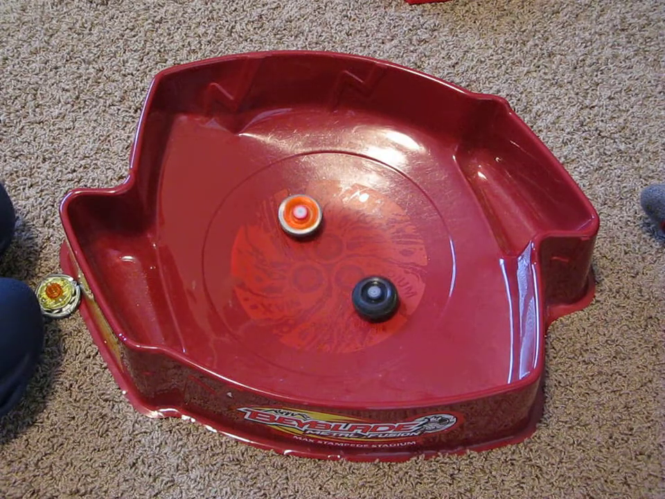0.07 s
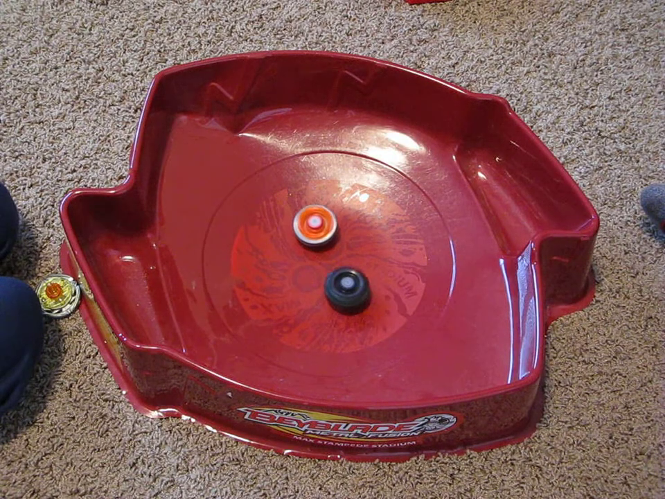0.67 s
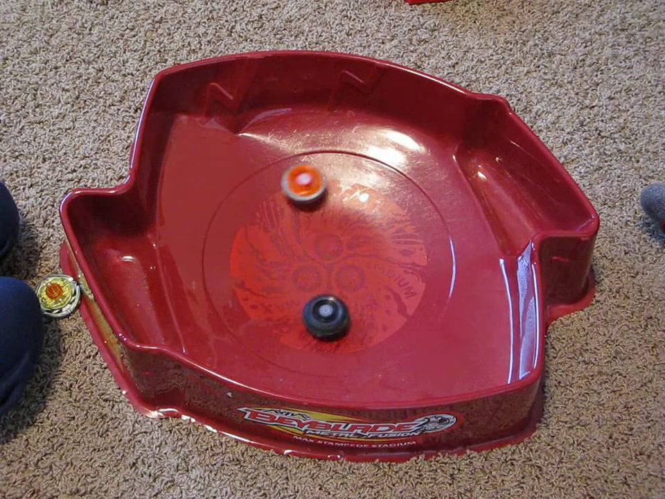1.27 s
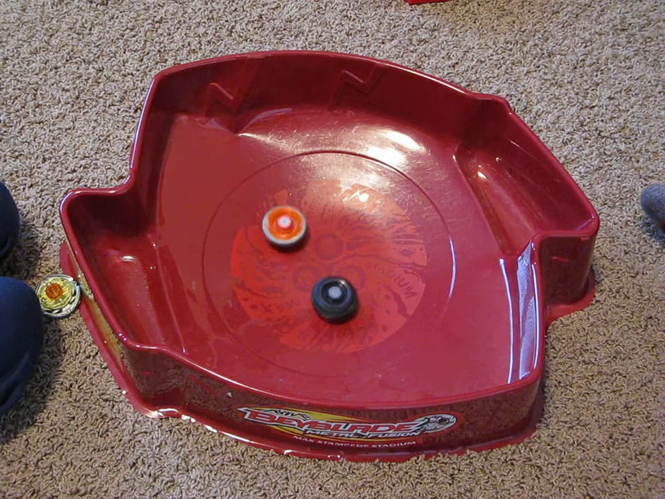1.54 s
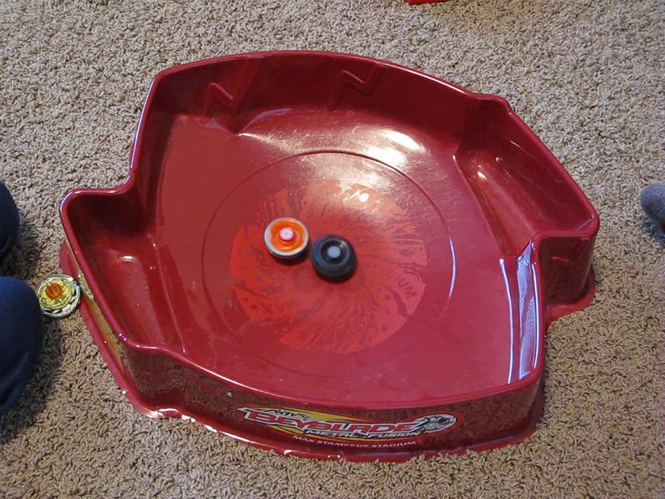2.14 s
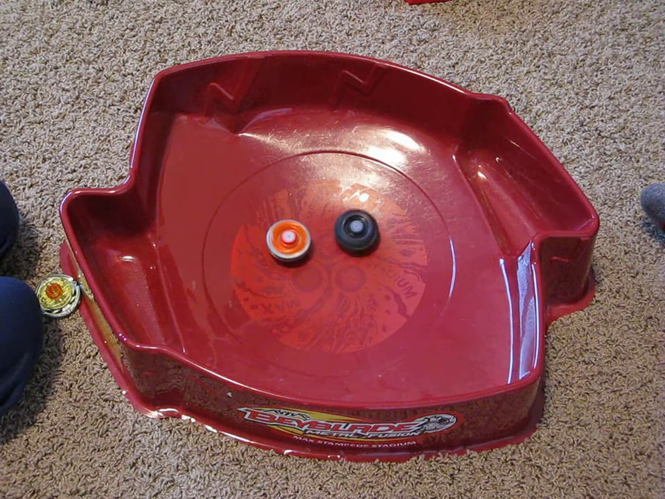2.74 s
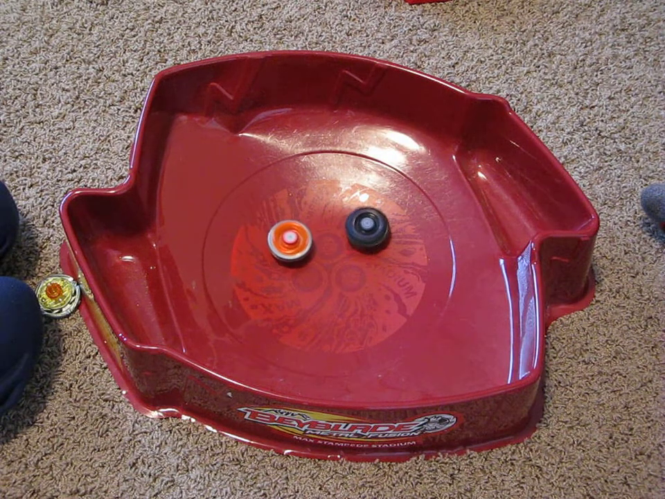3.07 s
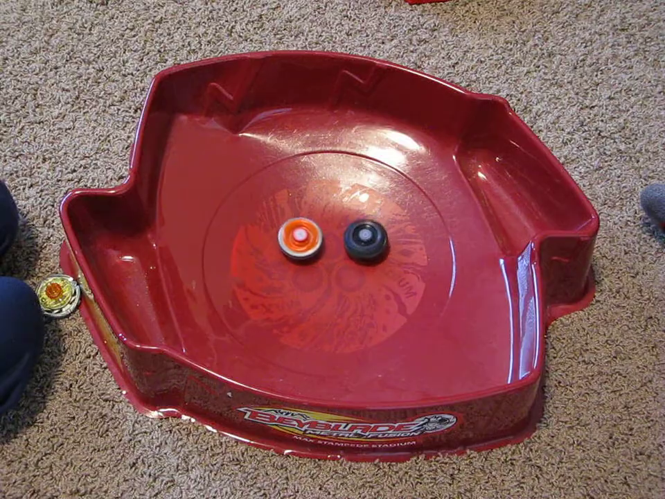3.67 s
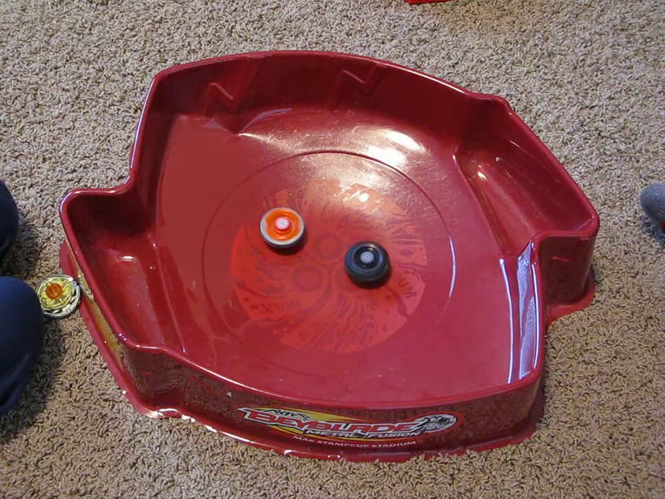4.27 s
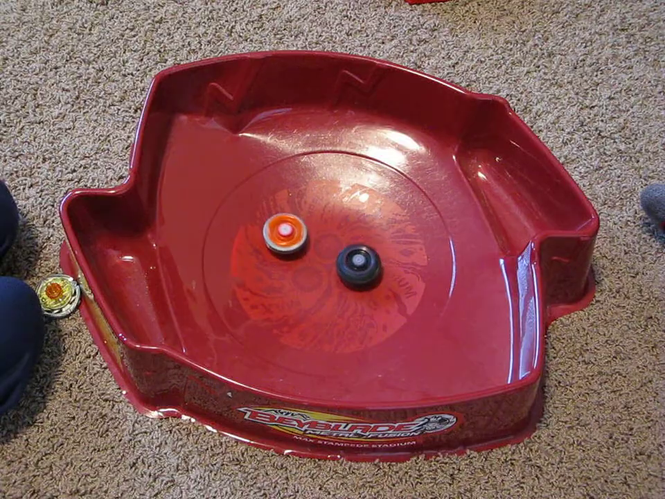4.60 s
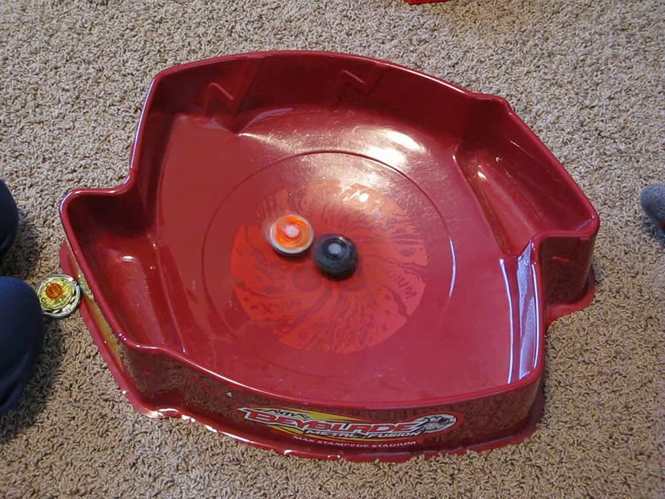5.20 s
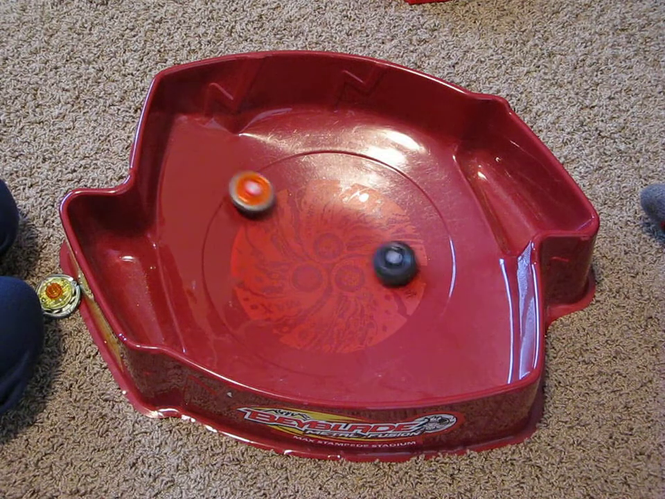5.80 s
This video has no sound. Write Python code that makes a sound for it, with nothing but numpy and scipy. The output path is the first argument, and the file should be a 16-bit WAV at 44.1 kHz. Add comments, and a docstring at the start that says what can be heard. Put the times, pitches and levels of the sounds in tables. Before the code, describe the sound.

Two metal spinning tops whirr in a plastic bowl and clash four times with sharp clinks and brief high, shimmering rings.

```python
"""In a plastic bowl on a carpet, two metal spinning tops circle and clash four times.
Each impact cracks and excites the modes of their metal wheels; rotation splits every mode into a
shimmering cluster. Friction at the tips makes the shell whirr and chatter, and the tops rattle, knock
and bump against it. Cloth rustles nearby over the hiss of the room, and the camera's gain ducks
after each clash."""
import sys
import numpy as np
from scipy import signal
from scipy.fft import rfft, irfft, next_fast_len
from scipy.io import wavfile
from scipy.ndimage import uniform_filter1d, minimum_filter1d, map_coordinates

SR = 44100
rng = np.random.default_rng(int(sys.argv[2]) if len(sys.argv) > 2 else 0)


def bounce(signal):
    """Save signal as a 16-bit WAV file at the path given by the first command-line argument."""
    frames = np.transpose(np.atleast_2d(signal))
    limited = np.clip(frames, -1, 1)
    pcm = np.round(limited * 32767).astype(np.int16)
    wavfile.write(sys.argv[1], SR, pcm)


N = 261639
TIME = np.arange(N) / SR

# Rotation of the tops. Each row: time in seconds, turns per second.
SPIN_RATE = [(0, 42.7), (1.3, 41), (2.3, 39.5), (4.4, 38), (5.18, 37.4), (5.21, 35), (5.93, 34.4)]
# Collisions. Each row: start in seconds, crack in dB, contact in seconds, clack in Hz, sizzle in dB,
# tilt in dB per octave, bowl thud in dB, first wheel in dB, second wheel in dB, ring length factor.
COLLISIONS = [(-.3, -12, .002, 5000, 0, 0, -20, -27, -60, 0.8),
              (0.9894, -12.5, 0.0022, 5100, -3, 1, -56, -31.5, -38, 0.46),
              (1.0045, 0.5, 0.0043, 5200, 10, 0, -15, -38, -13, 0.75),
              (2.063, -2.5, 0.003, 4370, 11.5, 1, -23.5, -21, -36, 0.89),
              (4.0857, 0.5, 0.0032, 10250, -15, 1.2, -11, -20, -29.5, 1.054),
              (5.197, 3, 0.0043, 6900, 6, 0.35, -9, -19, -18.5, 0.86)]


def clashes():
    """Impact: brief metal contact radiates a broadband crack, and the tips pass the kick to the bowl."""
    # Spectra. Each row: frequency in Hz, relative level in dB.
    crack_spectrum = [(40, -54), (300, -18.5), (1000, -4.5), (2200, -8), (3000, -11), (4300, 0),
                      (6000, -1.5), (8500, -1.5), (11000, 0.5), (14000, -1), (16000, -8.5)]
    thud_spectrum = [(20, -42), (45, -20), (70, -10), (130, -6.5), (280, 15), (600, -11.5), (1300, 1),
                     (2500, -5), (6000, -17)]
    out = np.zeros(N)
    for s, db, contact, clack_hz, sizzle_db, tilt_db, thud_db, *_ in COLLISIONS:
        def colour(hz):
            # sharper edges give more top treble
            sizzle = sizzle_db * hump(hz, 18400, octaves=0.52)
            return along(crack_spectrum, hz) + sizzle + tilt_db * np.log2(hz + 1)

        crack = burst(lambda hz: colour(hz) + 7 * hump(hz, clack_hz, octaves=0.19), contact, squareness=2)
        # the walls gather the crack from all directions, so its tail has a smoother colour
        spread = burst(colour, life=0.0046)
        spread *= np.linalg.norm(crack) / np.linalg.norm(spread)
        thud = burst(lambda hz: along(thud_spectrum, hz), life=0.0021, squareness=1.7)
        thud = high_pass(thud, edge_hz=63, order=3)
        add(out, s, amp(db) * crack)
        add(out, s, amp(db - 8) * reverberation(spread))
        add(out, s, amp(thud_db) * in_room(thud, wet_db=-33))
    return out


def rings():
    """Free vibration: after each clash both wheels ring in their modes, each as hard as it was struck."""
    # Wheel modes. Each row: frequency in Hz, lobes round the rim.
    first_modes = [(5428, 2), (9502, 2), (11710, 1), (13350, 3), (14485, 3), (15365, 1), (15685, 1)]
    second_modes = [(5663, 2), (8600, 3), (9500, 2), (11660, 1)]
    # Their decay. Each row: relative level in dB, t60 in seconds at length factor 1, unbalance in dB.
    first_decay = [(-2.5, 1.353, -1), (-2.5, 0.4, -1.5), (-30, 0.17, -6), (-7, 0.18, 3), (2, 0.25, -10),
                   (-3, 0.19, -15), (-28, 0.29, -14)]
    second_decay = [(-14.5, 1, 9), (-17, 0.57, -1), (-9.5, 0.56, -8), (-7, 0.32, -10)]
    angle = spin_angle()
    out = np.zeros(N)
    for s, *_, first_db, second_db, length in COLLISIONS:
        out += amp(first_db) * wheel(first_modes, first_decay, s, length, angle)
        out += amp(second_db) * wheel(second_modes, second_decay, s, length, angle)
    return in_room(out, wet_db=-6.5)[:N]


def wheel(modes, decay, s, length, angle):
    """Modulation: lobes sweep past the listener, splitting each mode by multiples of the spin rate."""
    # Relative levels in dB, one for each of the five orders below.
    sideband_db = [-6.5, -2, -18, -9.5, 1]
    inner = np.array([0, 1, 1, 1, 0])
    out = np.zeros(N)
    for (hz, lobes), (db, t60, unbalance_db) in zip(modes, decay):
        span = (TIME >= s) & (TIME < s + t60 * length)
        t = TIME[span] - s
        fade = amp(db - 60 * t / (t60 * length))
        orders = [-lobes, -1, 0, 1, lobes]
        for order, line_db in zip(orders, sideband_db + inner * unbalance_db):
            phase = 2 * np.pi * (hz * t + rng.random()) + order * angle[span]
            # the flung top moves through the bowl's echoes, so each line's level drifts until it slows
            drift = sway(len(t), rate=18.3, depth_db=3, settle=0.58)
            out[span] += amp(line_db) * fade * drift * np.sin(phase)
    return out


def spin_angle():
    """Rotation angle in radians, the integral of the spin rate."""
    return 2 * np.pi * np.cumsum(np.interp(TIME, *np.transpose(SPIN_RATE))) / SR


def tips():
    """Friction noise: the tips rub the shell, harder once a turn and louder the faster a top runs."""
    # Runs across the bowl. Each row: time of top speed in seconds, whirr in dB, scratch in dB,
    # run-up in seconds, coasting in seconds.
    runs = [(0.02, -47.5, -50.5, 0.05, 0.15), (1.16, -40, -33.5, 0.037, 0.14),
            (3.45, -53, -57, 0.081, 0.17), (4.2, -52, -47, 0.05, 0.35), (5.362, -39, -30.5, 0.016, 0.17),
            (5.75, -47, -49.5, 0.088, 0.34), (5.915, -41.5, -44.5, 0.067, 0.2)]
    # Spectra. Each row: frequency in Hz, relative level in dB.
    drum_spectrum = [(30, -28), (70, -12.5), (125, -12), (200, 0), (290, 6), (400, 2.5), (600, -1),
                     (1200, -20), (4000, -61)]
    whirr_spectrum = [(50, -36), (200, -39), (500, -6.5), (780, 0), (1000, -1), (1280, -2), (1650, -2.5),
                      (2000, -4.5), (2600, -8.5), (5000, -44)]
    scratch_spectrum = [(100, -58), (1200, -22), (2600, -8), (4200, -0.5), (6200, -7), (9000, -6.5),
                        (12000, -8), (16000, -12)]
    drum_db, whirr_db, scratch_db = -59.5, -57, -60.5  # spinning on the spot
    regrip = 2.36  # slipping dies this many times faster than rolling
    rolling = sum((amp(db) * run_speed(s, rise, coast)) ** 2 for s, db, _, rise, coast in runs) ** .5
    slipping = sum((amp(db) * run_speed(s, rise, coast / regrip)) ** 2
                   for s, _, db, rise, coast in runs) ** .5
    grip = unit(amp(1.1 * np.cos(spin_angle()) + 0.79 * wobble(120)))
    wander = amp(1.5 * wobble(9))
    drum = np.hypot(amp(drum_db), amp(-6.5) * rolling)
    drum *= noise(lambda hz: along(drum_spectrum, hz) + bowl(hz))
    whirr = np.hypot(amp(whirr_db) * wander, rolling)
    whirr *= noise(lambda hz: along(whirr_spectrum, hz) + bowl(hz))
    scratch = np.hypot(amp(scratch_db), slipping) * noise(lambda hz: along(scratch_spectrum, hz))
    return grip * (drum + whirr + scratch)


def run_speed(s, rise, coast):
    """Frictional decay: a top's speed rises smoothly to 1 at time s, then drains exponentially."""
    t = TIME - s
    return np.exp(-(np.minimum(t, 0) / rise) ** 2 / 2 - np.maximum(t, 0) / coast)


def bowl(hz):
    """Resonance: the lift in dB that the modes of the plastic shell give each frequency."""
    # Each row: centre in Hz, width in Hz, lift in dB.
    resonances = [(288.3, 5.9, 7.5), (474, 17, 9.5), (791, 13, 2.5), (1148, 120, 5.5), (1329, 18, 7.5),
                  (2046, 11, 8)]
    return sum(db / (1 + (2 * (hz - centre) / width) ** 2) for centre, width, db in resonances)


def chatter(size=16384):
    """Frictional excitation: a slipping tip drives one shell resonance and a weaker one above it."""
    # Each row: midpoint in seconds, level in dB, half length in seconds, resonance in Hz.
    slips = [(0.151, -51, 0.051, 1350), (1.21, -44.5, 0.057, 495), (1.249, -44, 0.1, 770),
             (1.797, -49.5, 0.022, 1276), (2.134, -48.5, .035, 1273), (4.191, -45, 0.039, 1325),
             (4.803, -51.5, 0.066, 1303), (5.389, -48, 0.1, 757), (5.605, -45.5, 0.032, 1237),
             (5.81, -48.5, 0.035, 1310), (5.902, -35, .005, 4530)]
    out = np.zeros(N)
    t = (np.arange(size) - size / 2) / SR
    for s, db, half, centre_hz in slips:
        lower = noise(lambda hz: 45 * hump(hz, centre_hz, octaves=0.2) - 45, size)
        upper = noise(lambda hz: 45 * hump(hz, 1.594 * centre_hz, octaves=0.063) - 45, size)
        swell = np.exp(-(t / half) ** 2 / 2)
        add(out, s + t[0], amp(db) * swell * (lower + amp(-9) * upper))
    return out


def rattles():
    """Periodic impact: a leaning top strikes the bowl once a turn, with uneven force."""
    # Each row: start in seconds, relative level in dB, number of turns.
    leans = [(1.302, -32.5, 1), (1.38, -34.5, 4), (1.8846, -46, 4), (5.4451, -33, 2), (5.5924, -30, 1),
             (5.842, -30.5, 3)]
    # Each row: frequency in Hz, relative level in dB.
    spectrum = [(700, -25), (2500, -4), (4300, 9), (5800, -7), (6800, 0.5), (7800, -18), (9200, 1),
                (11500, -7), (16000, -12)]
    scatter_db = 2.5
    out = np.zeros(N)
    for s, db, turns in leans:
        period = 1 / np.interp(s, *np.transpose(SPIN_RATE))
        for turn in range(turns):
            tick = amp(rng.normal(0, scatter_db)) * burst(lambda hz: along(spectrum, hz), life=0.0034)
            add(out, s + turn * period, amp(db - 4) * in_room(tick, wet_db=1.5))
    return out


def knocks():
    """Impulse response: a light blow on the plastic excites a band coloured by the shell's modes."""
    # Each row: start in seconds, relative level in dB, centre in Hz, width in octaves,
    # contact in seconds.
    blows = [(.518, -43, 4270, 2.2, 0.012), (0.6676, -34.5, 1820, 1.1, 0.00093),
             (1.874, -37.5, 1240, 1.1, 0.0042), (1.923, -33, 1060, 1.1, 0.0043),
             (3.06, -41, 2080, 1.2, 0.0093), (3.142, -40.5, 1390, 2.3, 0.011),
             (3.2898, -25, 1390, 3.1, 0.0037), (3.401, -35.5, 1100, 2.6, 0.0084),
             (3.77, -39, 1190, 1.7, 0.013)]
    out = np.zeros(N)
    for s, db, centre_hz, octaves, contact in blows:
        knock = burst(lambda hz: 32 * hump(hz, centre_hz, octaves) + bowl(hz), contact)
        add(out, s, amp(db - 4) * in_room(knock, wet_db=1.5))
    return out


def bumps():
    """Damped resonance: flung tops bump over the bowl's slope and excite mainly its low modes."""
    # Each row: start in seconds, relative level in dB.
    jolts = [(1.12, -36), (1.297, -35.5), (5.31, -23.5), (5.344, -23.5), (5.369, -22), (5.717, -22)]
    # Each row: frequency in Hz, relative level in dB.
    spectrum = [(25, -55), (70, -49), (170, -5.5), (290, 8.5), (420, -3.5), (750, -1.5), (1300, -5),
                (2500, -12), (5000, -15), (12000, -50)]
    out = np.zeros(N)
    for s, db in jolts:
        bump = burst(lambda hz: along(spectrum, hz) + bowl(hz), life=0.017)
        add(out, s, amp(db - 9) * in_room(high_pass(bump, edge_hz=190), wet_db=0))
    return out


def cloth():
    """Friction of fibres: fabric beside the bowl gives soft swishes of grainy noise."""
    # Each row: midpoint in seconds, relative level in dB, half length in seconds.
    swishes = [(0.107, -48, 0.032), (0.437, -56.5, 0.061), (2.588, -50.5, 0.031), (3.117, -53.5, 0.054),
               (3.265, -50, 0.078), (3.532, -30.5, 0.025), (4.463, -47, 0.026), (4.564, -48.5, 0.027),
               (4.68, -49.5, 0.044), (4.794, -50, 0.031)]
    # Each row: frequency in Hz, relative level in dB.
    spectrum = [(290, -55), (500, -17), (1210, -15), (1420, -9.5), (2330, -10), (2770, -5), (3110, -5.5),
                (8580, -10.5), (13600, -14.5), (16000, -19)]
    stroke = sum(amp(db) * np.exp(-((TIME - s) / half) ** 2 / 2) for s, db, half in swishes)
    fibres = noise(lambda hz: along(spectrum, hz)) * amp(1.7 * wobble(300))
    return in_room(amp(-2.5) * stroke * fibres, wet_db=-2.5)[:N]


def room_hiss():
    """Ambient noise: a quiet, steady broadband floor."""
    # Each row: frequency in Hz, relative level in dB.
    spectrum = [(15, -62), (25, -39), (117, -2.5), (229, -7.5), (463, -4), (775, -4), (988, -8.5),
                (1440, -10.5), (1940, -11), (5140, -13.5), (5570, -18), (6210, -15.5), (16000, -26)]
    return amp(-54.5) * noise(lambda hz: along(spectrum, hz))


def reverberation(x):
    """Diffuse field: wall reflections build into a tail in which each band decays at its own rate."""
    # Each row: frequency in Hz, t60 in seconds.
    decay_times = [(150, 0.19), (1200, 0.37), (4500, 0.47), (9000, 0.34), (15000, 0.27)]
    hz, t, bands = signal.stft(rng.standard_normal(SR * 2 // 3), SR, nperseg=256)
    build = 1 - np.exp(-(t / 0.001) ** 2)
    fade = amp(-60 * t / along(decay_times, hz)[:, None])
    tail = signal.istft(bands * build * fade, SR, nperseg=256)[1]
    return signal.fftconvolve(x, tail / np.linalg.norm(tail))


def in_room(x, wet_db):
    """Superposition of the direct sound and its reverberation."""
    wet = reverberation(x)
    return np.pad(x, (0, len(wet) - len(x))) + amp(wet_db) * wet


def burst(gain_db, life, squareness=1, size=4096):
    """Dense, damped modes answer a blow as decaying noise; its energy grows with its life in seconds."""
    t = np.arange(size) / SR
    shape = np.exp(-(t / life) ** squareness) * (1 - np.exp(-t / 0.00005))
    return unit(noise(gain_db, size) * shape) * np.sqrt(np.mean(shape ** 2))


def sway(size, rate, depth_db, settle):
    """Random fading, rate knots a second, whose depth decays with time constant settle in seconds."""
    place = np.arange(size) * rate / SR
    knots = np.arange(int(size * rate / SR) + 2)
    depth = depth_db * np.exp(-knots / (rate * settle))
    return np.interp(place, knots, amp(depth * rng.standard_normal(len(knots))))


def wobble(rate):
    """A smooth random curve, rate knots a second."""
    return map_coordinates(rng.standard_normal(int(N * rate / SR) + 4), [TIME * rate])


def noise(gain_db, size=N):
    """Coloured noise of rms 1."""
    return unit(coloured(rng.standard_normal(size), gain_db))


def coloured(x, gain_db):
    """Zero-phase filtering by a gain in dB that depends on frequency."""
    size = next_fast_len(len(x) + 8192)
    hz = np.fft.rfftfreq(size, 1 / SR)
    return irfft(rfft(x, size) * amp(gain_db(hz)), size)[:len(x)]


def high_pass(x, edge_hz, order=2):
    """Attenuation of the bass below edge_hz."""
    return signal.sosfilt(signal.butter(order, edge_hz, "highpass", fs=SR, output="sos"), x)


def hump(hz, centre_hz, octaves):
    """A bell of height 1 on the log-frequency axis."""
    return np.exp(-(np.log2((hz + 1) / centre_hz) / octaves) ** 2)


def along(points, hz):
    """Interpolation of (Hz, value) points on the log-frequency axis."""
    point_hz, values = np.transpose(points)
    return np.interp(np.log(hz + 1), np.log(point_hz + 1), values)


def add(track, s, sound):
    """Superposition of a sound on the track at s seconds."""
    start = round(s * SR)
    part = sound[max(-start, 0):max(N - start, 0)]
    track[max(start, 0):][:len(part)] += part


def amp(db):
    """Decibels to amplitude ratio."""
    return 10 ** (np.asarray(db) / 20)


def unit(x):
    """Normalisation to rms 1."""
    return x / np.sqrt(np.mean(x ** 2) + 1e-20)


def scene():
    """Superposition: tops, bowl and cloth add to the hiss of the room in one channel."""
    hiss = room_hiss()
    return (clashes() + rings() + tips() + chatter() + rattles() + knocks() + bumps() + cloth() + hiss)[None]


def gain_control(x, limit_db, hold_s, release_db_per_s):
    """Automatic gain control: loud peaks pull the gain down at once; it holds, then climbs back."""
    level_db = 10 * np.log10(np.abs(uniform_filter1d(x ** 2, SR // 700)) + 1e-12)
    width = max(int(hold_s * SR) // 2, 1)
    held = minimum_filter1d(np.minimum(limit_db - level_db, 0), 2 * width + 1, origin=width)
    climb = release_db_per_s * TIME
    return x * amp(np.minimum.accumulate(held - climb) + climb)


def record(dry):
    """Compression and band limiting: the camera ducks, rounds peaks, cuts deep bass and top treble."""
    ceiling, top_hz = 0.8, 15750
    x = gain_control(dry[0], limit_db=-10, hold_s=0.04, release_db_per_s=149)
    x = x / (1 + np.abs(x / ceiling) ** 4) ** (1 / 4)
    x = high_pass(x, edge_hz=30)
    return coloured(x, lambda hz: -np.clip((hz - top_hz) / 20, 0, 120))[None]


dry = scene()
out = record(dry)
bounce(out)
```